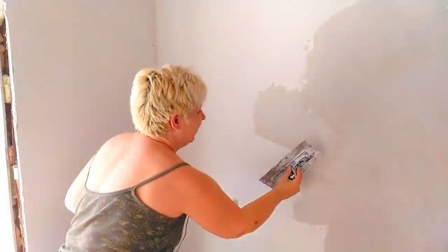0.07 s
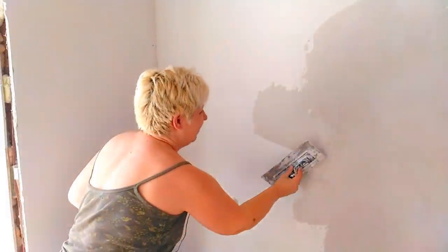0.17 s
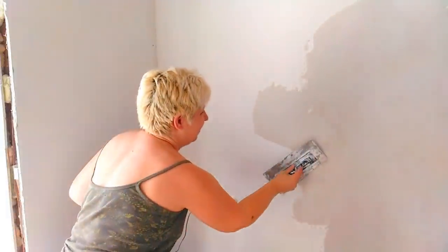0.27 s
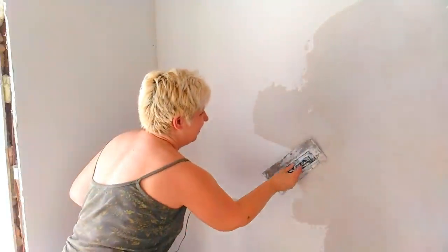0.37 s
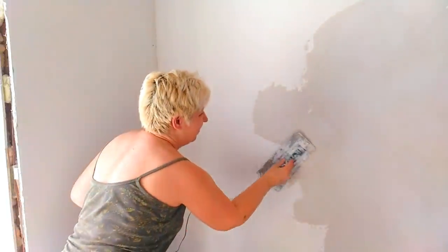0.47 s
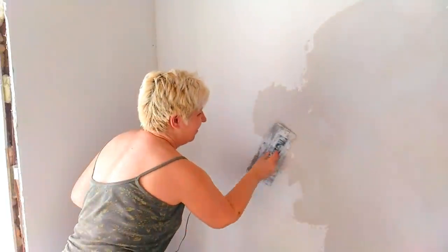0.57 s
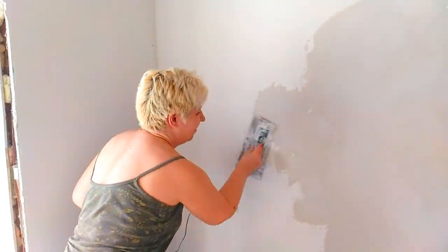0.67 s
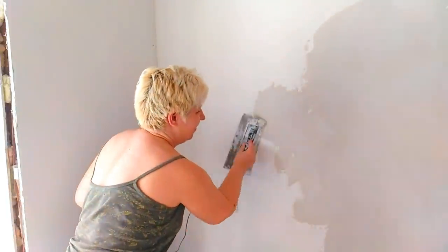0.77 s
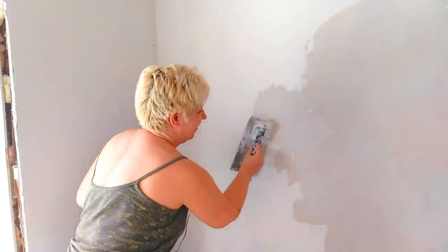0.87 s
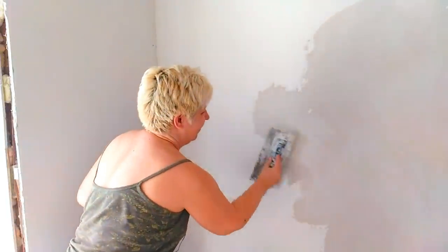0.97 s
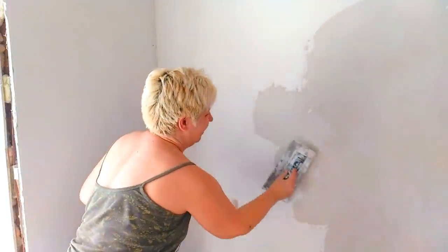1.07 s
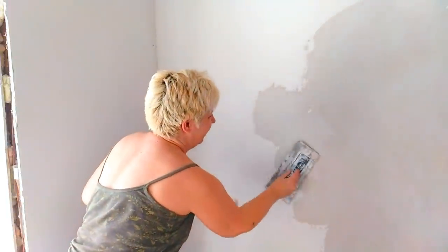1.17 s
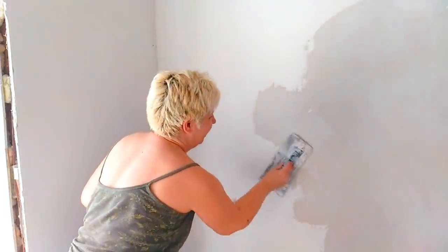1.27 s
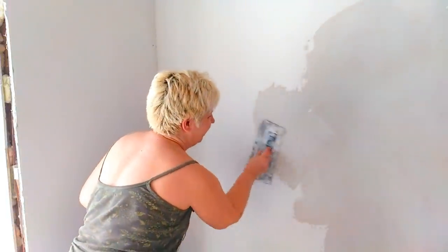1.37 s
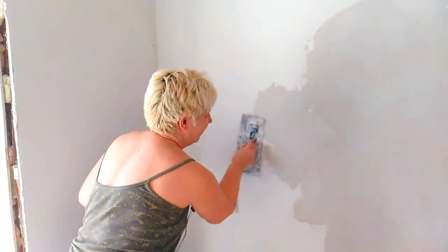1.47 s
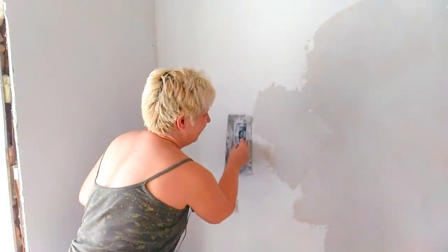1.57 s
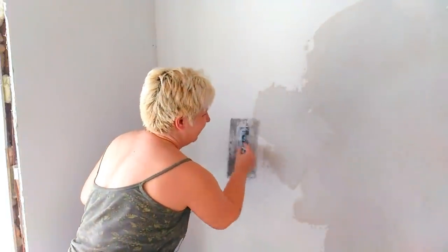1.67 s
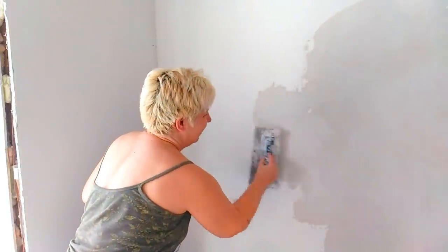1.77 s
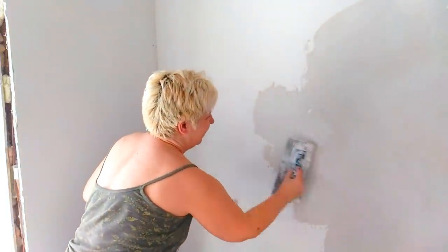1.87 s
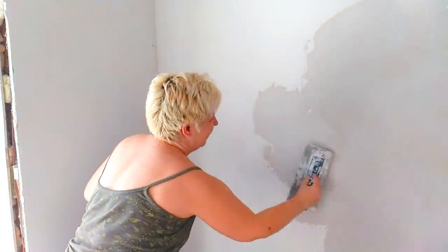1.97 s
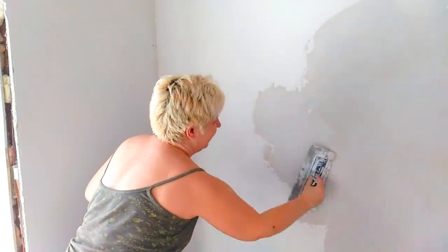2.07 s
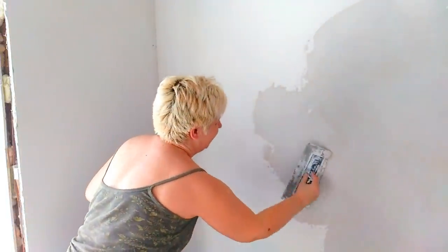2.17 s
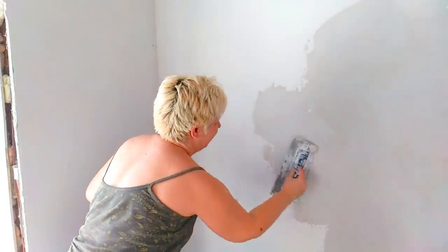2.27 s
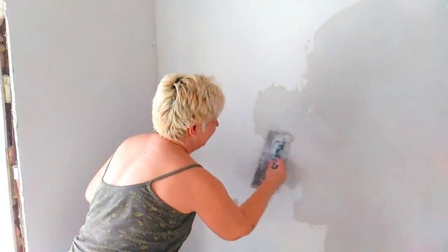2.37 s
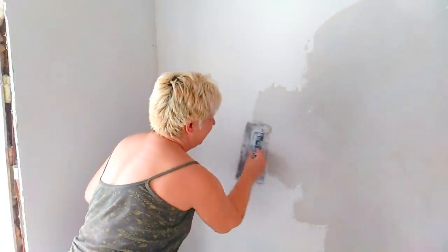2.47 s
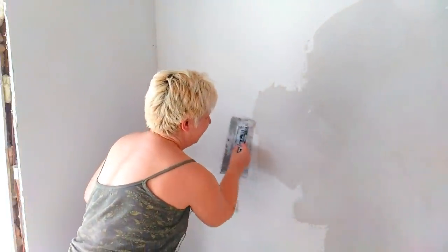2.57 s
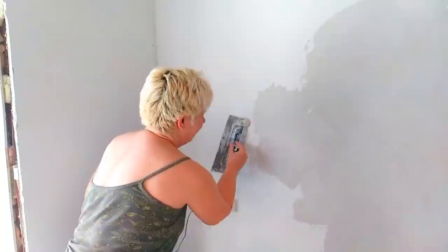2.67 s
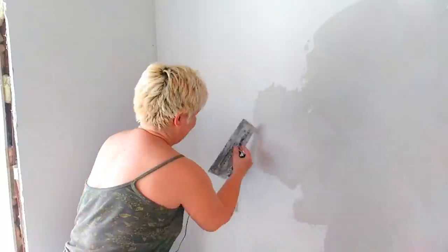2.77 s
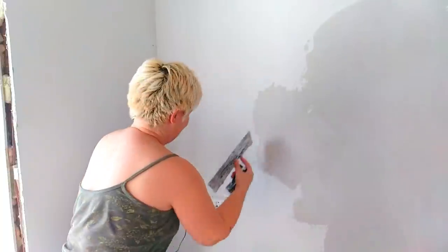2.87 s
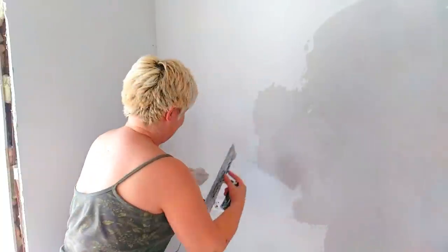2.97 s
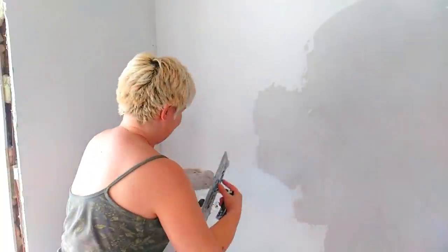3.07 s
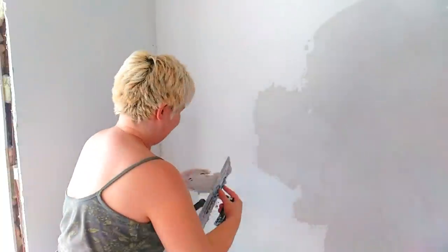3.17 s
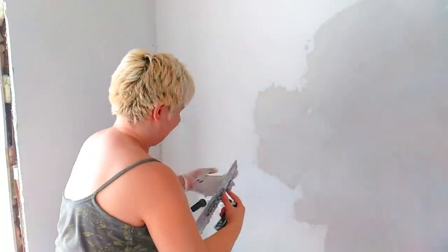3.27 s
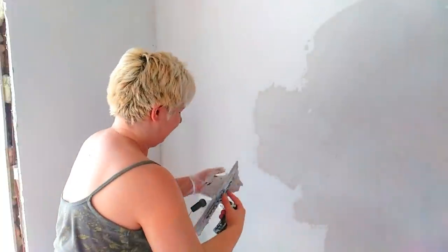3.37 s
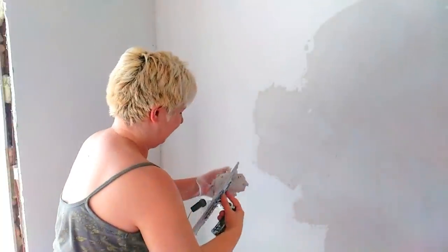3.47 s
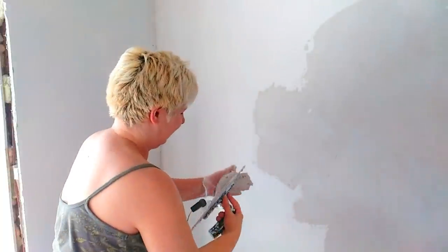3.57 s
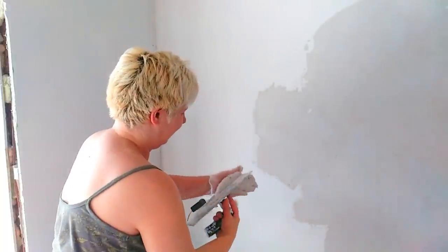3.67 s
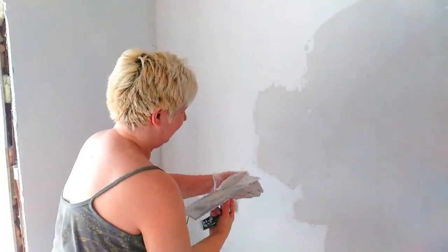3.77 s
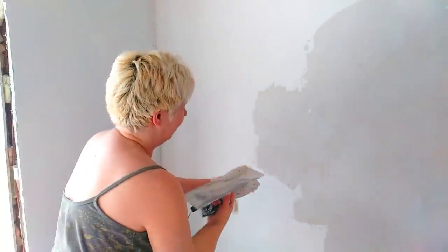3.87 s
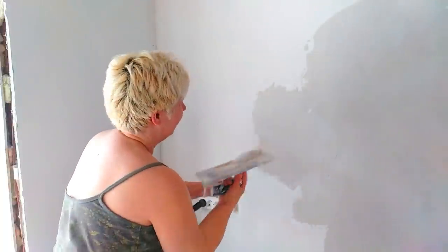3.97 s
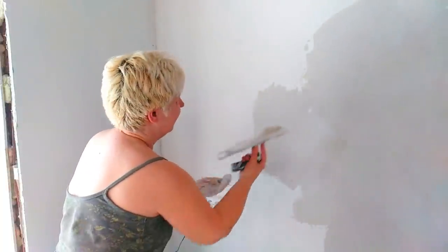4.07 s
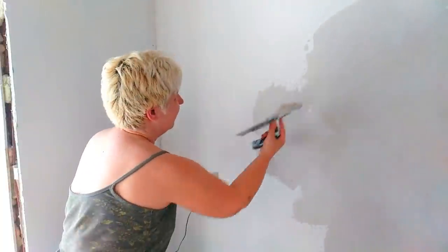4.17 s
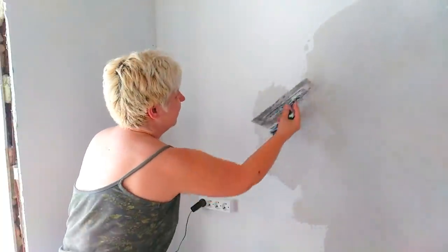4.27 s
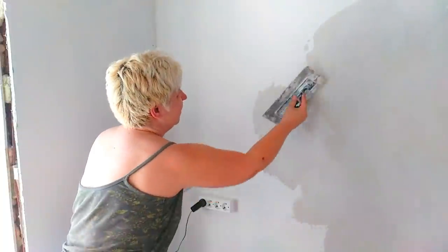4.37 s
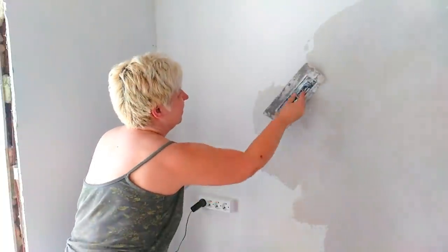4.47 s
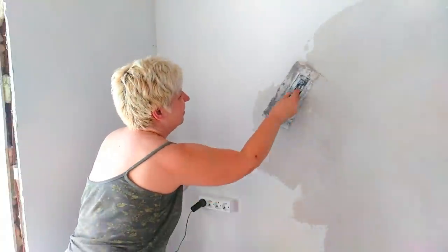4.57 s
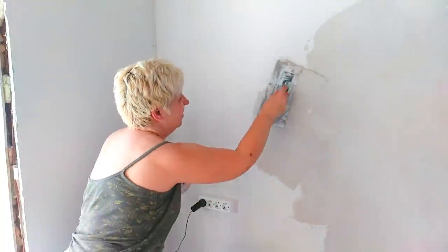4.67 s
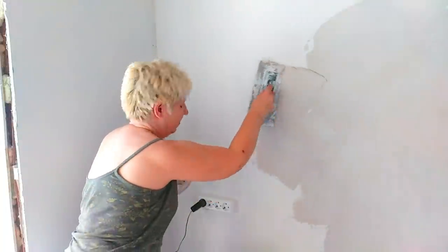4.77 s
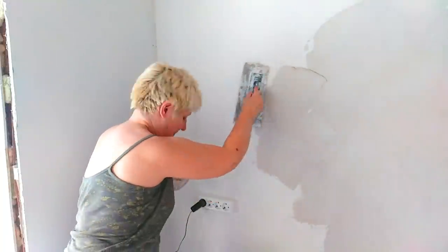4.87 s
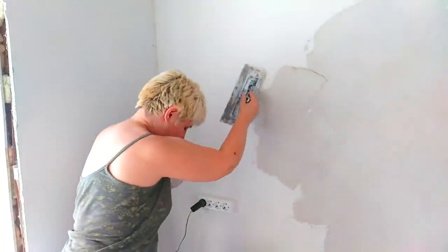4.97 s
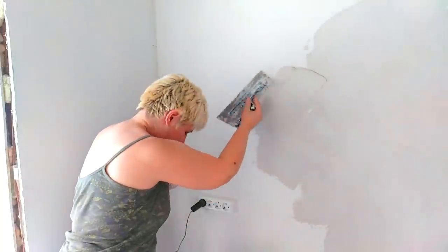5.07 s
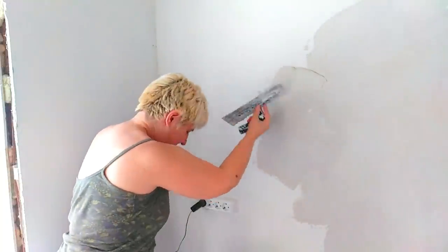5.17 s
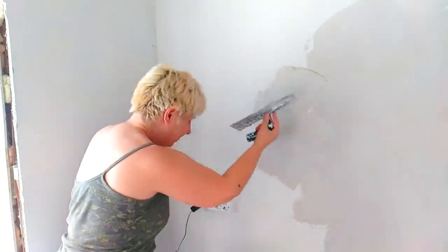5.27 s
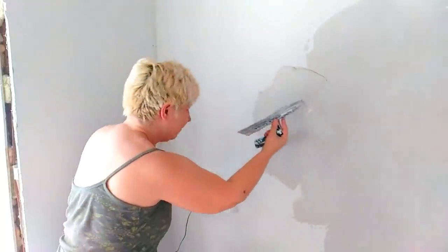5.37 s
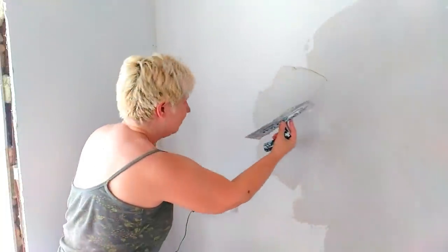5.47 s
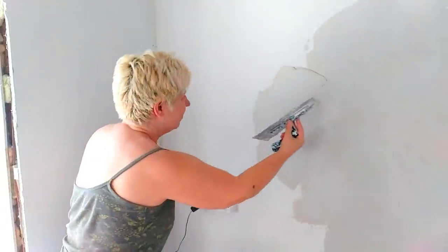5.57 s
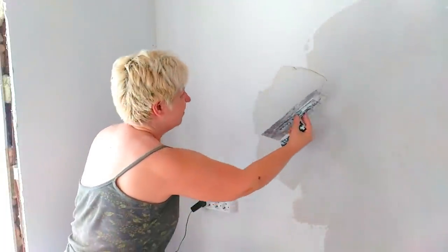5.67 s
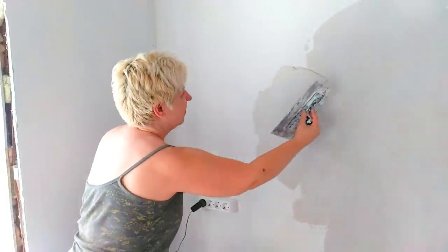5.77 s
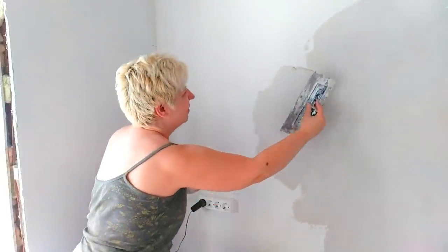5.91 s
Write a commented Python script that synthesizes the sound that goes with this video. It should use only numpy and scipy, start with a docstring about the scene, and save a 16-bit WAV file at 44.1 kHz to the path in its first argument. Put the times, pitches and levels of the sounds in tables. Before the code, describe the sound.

Close stereo sound of plastering: sandy, metallic scrapes swell and cut off abruptly, each introduced by a clack or hollow wall knock. Three strong strokes fall in the first half, then only soft brushing, then a rising scrape that ends in a bright snap and a few light taps. The bare room adds a brief, diffuse echo, over low rumble and faint hiss.

```python
"""In a small bare room, a steel trowel spreads wet plaster on a wall.
Blade landings are short bursts of noise that clack, splash and knock; some also thump the wall's low modes.
Under the dragging steel, random clicks stand for grit and are filtered into rub, rasp and hiss.
Short noise bands swell the scrape for a moment around one pitch, and random echoes blur the trowel.
Low rumble and faint hiss lie beneath; the loudest peaks are rounded off near full scale."""
import sys
import numpy as np
from scipy import signal
from scipy.fft import rfft, irfft
from scipy.io import wavfile

SR = 44100
rng = np.random.default_rng(int(sys.argv[2]) if len(sys.argv) > 2 else 0)


def transcribe(signal):
    """Save signal, clipped to [-1, 1], as a 16-bit WAV file at the path in sys.argv[1]."""
    frames = np.atleast_2d(signal).T
    limited = np.clip(frames, -1, 1)
    pcm = np.round(limited * 32767).astype(np.int16)
    wavfile.write(sys.argv[1], SR, pcm)


N = 261954
TIME = np.arange(N) / SR  # seconds


def gain_of(db):
    """Turns decibels into amplitude."""
    return 10 ** (np.asarray(db) / 20)


def evened(x):
    """Scales a sound to an average (rms) level of 1."""
    return x / np.sqrt(np.mean(x ** 2) + 1e-20)


def read(points, hz):
    """Reads a two-column table between its points, along a log-frequency axis."""
    table_hz, value = np.transpose(points)
    return np.interp(np.log(hz + 1), np.log(table_hz + 1), value)


def add(mix, start_s, sound):
    """Mixes a sound in at its start time."""
    part = mix[max(round(start_s * SR), 0):][:len(sound)]
    part += sound[:len(part)]


def band(x, hz, spread, order=2):
    """Keeps a band that reaches a factor of 1 + spread to either side of hz."""
    edges = [hz / (1 + spread), hz * (1 + spread)]
    return signal.sosfilt(signal.butter(order, edges, "band", fs=SR, output="sos"), x)


def wander(rate_hz):
    """Smooth random motion of rms 1: noise with everything from rate_hz up removed."""
    slow = rfft(rng.standard_normal(N)) * (np.fft.rfftfreq(N, 1 / SR) < rate_hz)
    return evened(irfft(slow, N))


def ramp(t, length_s):
    """Rises from 0 to 1 as t goes from 0 to length_s."""
    return np.clip(t / max(length_s, 1e-4), 0, 1)


BITE_S = 0.017  # the edge bites almost at once
TILT_LEAD_S, TILT_S = 0.022, 0.12  # tilting starts this long before the lift, and takes this long
TILT_HISS_DB, TILT_RUB_DB = -8.5, 6  # tilting trades hiss for rub
SKIM_DB, PRESS_RANGE_DB = -55.5, 28.5  # rasp of a barely touching blade; how much louder fully pressed
MURMUR_GROWTH, RUB_GROWTH = 0.287, 1.06  # growth under pressure, relative to the rasp's
MURMUR_DB_PER_S = 60.5  # how fast the wall's murmur fades
RUB_FADE = 0.99  # the rub's speed of fading, relative to the rasp's

# Passes of the blade, pressed hard or skimming; hiss and rub are relative to the rasp:
# start_s, rise_s (until full pressure), hold_s, growth_db (until full pressure), lift_db_per_s (fading),
# rasp_db (steel), hiss_db (grit), rub_db (wall), murmur_db (wall)
PASSES = [(-.05, .08, 0.31, -18, 22, -45.5, -5.5, -1, -70), (.44, .16, 0.21, 26, 304, -13.5, 3.5, -10, -39),
          (1.268, .04, 0.098, 3, 194, -47, 8.5, -9, -38),
          (1.378, 0.025, 0.052, 3, 200, -25.5, -0.5, -15, -45),
          (1.435, 0.029, 0.13, 9.5, 200, -11, 3.5, -13.5, -39.5),
          (1.8, .02, 0.26, 3, 200, -50, -9, -8.5, -59), (2.192, .06, 0.022, 14, 240, -31, 3, -3, -37),
          (2.239, 0.19, 0.26, 15, 241, -17.5, 6.5, -7, -38.5),
          (2.804, 0.026, 0.091, 7, 55, -52, 2, 3.5, -40.5), (3.273, 0.24, 0.067, 2, 33, -53.5, 11, -8, -78),
          (3.6, 0.077, 0.042, 7, 81, -50, 11.5, -8, -70),
          (3.806, 0.025, 0.021, -3, 153, -47.5, 3.5, -6, -68),
          (4.064, 0.05, 0.052, -1, 245.5, -49.5, -3, -1.5, -70),
          (4.604, 0.026, 0.039, -7, 200, -40, 8, -15, -51),
          (4.698, .255, .012, 24.5, 249, -18.5, 7, -5, -46),
          (5.046, 0.032, 0.19, -21, 260, -40.5, 10, -12, -47),
          (5.328, 0.0074, 0.031, 0, 260, -35, 9.5, -3.5, -50),
          (5.474, 0.046, 0.037, 9, 320, -46, 3.5, 1.5, -42.5), (5.697, 0.12, .04, 5, 198, -55, 5, -14, -49)]


def drag(step=32):
    """Pressure, tilt and lift of each pass set the levels (dB) of rasp, hiss, rub and murmur."""
    clock, power = TIME[::step], 1e-12
    for start_s, rise_s, hold_s, growth_db, lift_db_per_s, full_db, hiss_db, rub_db, murmur_db in PASSES:
        t = clock - start_s
        lifted_s = t - rise_s - hold_s
        fading_s = np.maximum(lifted_s, 0)
        slack_db = growth_db * (1 - ramp(t, rise_s))
        fade_db = lift_db_per_s * fading_s
        pressed = ramp(full_db - SKIM_DB, PRESS_RANGE_DB)
        # the harder the pass is pressed, the more its tilt is heard
        tilt = ramp(lifted_s + TILT_LEAD_S, TILT_S) * pressed
        rasp = full_db - slack_db - fade_db
        hiss = rasp + hiss_db + TILT_HISS_DB * tilt
        rub = full_db + rub_db - RUB_GROWTH * slack_db + TILT_RUB_DB * tilt - RUB_FADE * fade_db
        murmur = murmur_db - MURMUR_GROWTH * slack_db - MURMUR_DB_PER_S * fading_s
        # overlapping passes add as power
        power = power + (ramp(t, BITE_S) * gain_of([rasp, hiss, rub, murmur])) ** 2
    return [np.interp(TIME, clock, db) for db in 10 * np.log10(power)]


def grit(per_s, spread_db):
    """Sand grains slipping under the edge: dense clicks of uneven size."""
    size = gain_of(spread_db * np.minimum(rng.exponential(1, N), 4))
    sign = rng.choice([-1, 1], N)
    slips = rng.random(N) < per_s / SR
    return evened(size * sign * slips)


# Colour of the scrape: pitch_hz, level_db
SCRAPE_COLOUR = [(100, -6), (190, -10), (232, -0.5), (330, -6.5), (560, -10), (950, -5), (1700, 1.5),
                 (2700, 1.5), (3600, -2), (6400, -5), (9000, 3), (10400, 0), (12200, -10), (15400, -18)]


def coloured(x, low_hz, high_hz, size=4096):
    """Filters x with one region of the scrape colour; the filter starts promptly and has unit energy."""
    hz = abs(np.fft.fftfreq(size, 1 / SR)) + 1
    edges = np.sqrt((1 + (low_hz / hz) ** 8) * (1 + (hz / high_hz) ** 8))
    gain = gain_of(read(SCRAPE_COLOUR, hz)) / edges
    # this phase packs the filter's energy near its start
    spectrum = np.exp(np.conj(signal.hilbert(np.log(gain + 1e-5))))
    ring = np.fft.ifft(spectrum).real[:size // 2]
    return signal.oaconvolve(x, ring / np.linalg.norm(ring))[:N]


def scrape(drag_db):
    """Grit under one part of the edge drives wall (rub), steel (rasp) and wet surface (hiss)."""
    rasp_db, hiss_db, rub_db = drag_db
    rub = coloured(grit(per_s=3000, spread_db=2.0) * gain_of(rub_db), 123, 970)
    rasp = coloured(grit(per_s=2500, spread_db=3.5) * gain_of(rasp_db), 880, 4900)
    hiss = coloured(grit(per_s=5000, spread_db=4.5) * gain_of(hiss_db), 4820, 21000)
    return gain_of(-3.0) * rub + gain_of(-0.48) * rasp + gain_of(-1.17) * hiss


# The scrape swells for a moment around one pitch:
# middle_s, length_s, pitch_hz, spread (fraction of pitch), level_db
SCRAPE_SWELLS = [(.77, .12, 1670, 0.17, -19), (0.754, 0.19, 4380, 0.34, -15),
                 (1.524, 0.2, 5130, 0.28, -11.5), (1.58, .12, 2200, 0.29, -13.5),
                 (2.544, 0.25, 690, 0.78, -21.5), (2.685, .11, 840, 0.77, -14),
                 (4.959, 0.09, 1380, 0.53, -14.5), (5.23, 0.095, 820, 0.45, -37.5)]


def scrape_swells():
    """Short noise bands, each around one pitch, that rise and fall within the scrape."""
    out = np.zeros(N)
    for middle_s, length_s, pitch_hz, spread, db in SCRAPE_SWELLS:
        spell = signal.windows.hann(int(length_s * SR))
        noise = evened(band(rng.standard_normal(len(spell)), pitch_hz, spread))
        add(out, middle_s - length_s / 2, gain_of(db) * spell * noise)
    return out


def strokes(drag_db, judder_db=2.0, count=3):
    """The whole blade judders; each part of its long edge sounds into the room by its own paths."""
    juddering_db = drag_db + judder_db * wander(rate_hz=46)
    parts = [room(scrape(juddering_db) + scrape_swells(), direct_db=-5.0) for _ in range(count)]
    return sum(parts) / np.sqrt(count)


KNOCK_SPREAD = 0.61  # width of a knock, as a fraction of its pitch


def contact(contact_s, db, knock_hz=None):
    """A noisy burst of force as steel lands bit by bit; given a pitch, it becomes a knock."""
    t = TIME[:SR // 8]
    burst = t / contact_s * np.exp(-t / contact_s) * rng.standard_normal(len(t))
    if knock_hz:
        burst = band(burst, knock_hz, KNOCK_SPREAD)
    return gain_of(db) * burst / np.linalg.norm(burst)


EDGE_KNOCK_HZ, FLAT_CONTACT_S = 720, 0.0066

# The blade lands edge first, then flat:
# start_s, contact_s, delay_s (until flat), clack_db, splash_db, edge_knock_db, flat_knock_db,
# flat_knock_hz, wall_thump_db
LANDINGS = [(.341, 0.0026, 0.0068, -26.5, -29.5, -19, -17, 173, -14.5),
            (1.264, 0.0065, .01, -27.5, -28.5, -32.5, -19.5, 296, -17.5),
            (2.17, 0.0039, 0.015, -22.5, -23.5, -30.5, -24, 195, -21),
            (4.222, 0.0027, 0.013, -26.5, -30, -25.5, -28, 230, -60),
            (4.5, 0.0073, .016, -23, -17, -21.5, -15.5, 235, -31),
            (5.386, 0.0033, 0.00193, -30, -35, -35, -32, 320, -21.5),
            (5.803, .0046, 0.0113, -28, -32, -31, -28.5, 180, -34)]
# The edge alone taps the wall or snags a lump: start_s, contact_s, clack_db, splash_db, knock_db
TAPS = [(0.29, 0.0032, -40, -33, -33.5), (.331, 0.0028, -29, -43, -33), (.438, 0.0037, -40, -28, -48),
        (.476, 0.0046, -23, -29, -39), (2.031, 0.0098, -44, -37, -34), (2.394, 0.0033, -15, -27, -34.5),
        (4.033, 0.0045, -35, -25.5, -40.5), (4.618, 0.0099, -33.5, -29.5, -49),
        (4.752, 0.0049, -19.5, -34, -33), (4.866, 0.00064, -17.5, -9.5, -21.5),
        (5.745, 0.0022, -33, -46, -48)]


def impacts(energy_s=.003, tap_hz=450):
    """The blade meets a wall cushioned by wet plaster: steel clacks, plaster squashes out, wall knocks."""
    clack, splash, knock = np.zeros((3, N))
    for start_s, contact_s, delay_s, clack_db, splash_db, edge_db, flat_db, flat_hz, _ in LANDINGS:
        add(clack, start_s, contact(contact_s, clack_db))
        add(splash, start_s, contact(contact_s, splash_db))
        add(knock, start_s, contact(contact_s, edge_db, EDGE_KNOCK_HZ))
        add(knock, start_s + delay_s, contact(FLAT_CONTACT_S, flat_db, flat_hz))
    for start_s, contact_s, clack_db, splash_db, knock_db in TAPS:
        add(clack, start_s, contact(contact_s, clack_db))
        add(splash, start_s, contact(contact_s, splash_db))
        add(knock, start_s, contact(contact_s, knock_db, tap_hz))
    # a blow has the energy of its level held for energy_s
    blows = coloured(clack, 550, 3500) + coloured(splash, 3800, 14000) + knock
    return np.sqrt(energy_s * SR) * blows


# Low modes of wall and room: pitch_hz, level_db, t60_s (time to fade by 60 dB)
WALL_MODES = [(77.3, 2.5, 0.28), (138.5, -11.5, 0.25), (232.6, -10.5, 0.27)]


def boom(murmur_db, rise_s=0.0051):
    """Low modes ring after each landing; noise around the lowest murmurs under the moving blade."""
    murmur = evened(band(rng.standard_normal(N), WALL_MODES[0][0], spread=0.22))
    out = gain_of(murmur_db) * murmur
    t = TIME[:SR // 2]
    ring = np.zeros(len(t))
    for hz, db, t60_s in WALL_MODES:
        ring += gain_of(db) * np.sin(2 * np.pi * hz * t) * np.exp(-np.log(1000) * t / t60_s)
    onset = 1 - np.exp(-t / rise_s)
    for start_s, _, delay_s, *_, thump_db in LANDINGS:
        add(out, start_s + delay_s, -gain_of(thump_db) * ring * onset)
    return out


# The deep rumble swells as the body shifts: middle_s, length_s, level_db
RUMBLE_SWELLS = [(4.535, .12, -32), (4.68, 0.16, -37.5), (5.436, 0.123, -31), (5.837, .16, -29.5)]


def rumble_swells():
    """Short surges of low rumble under the late strokes: deep noise that rises and falls."""
    out = np.zeros(N)
    for middle_s, length_s, db in RUMBLE_SWELLS:
        spell = signal.windows.hann(int(length_s * SR))
        # the end of a longer noise, where the filter has settled
        rumble = band(rng.standard_normal(SR), 36, spread=.5)[-len(spell):]
        add(out, middle_s - length_s / 2, gain_of(db) * spell * evened(rumble))
    return out


# How alike left and right are: pitch_hz, likeness (0 unrelated, 1 identical)
LIKENESS = [(60, 0.46), (300, 0.93), (640, 0.4), (1300, 0), (15000, 0.099)]


def paired(z, hz):
    """Mixes two unrelated spectra into a left-right pair, alike by a different amount at each pitch."""
    same = np.clip(read(LIKENESS, hz), -1, 1)
    return np.array([z[0], same * z[0] + np.sqrt(1 - same ** 2) * z[1]])


# Echoes of the bare room: pitch_hz, t60_s (time to fade by 60 dB)
ROOM_T60 = [(100, 0.82), (250, 0.32), (600, 0.43), (1200, 0.36), (3000, 0.36), (8000, .37), (13000, 0.23)]


def echoes(first_s=.002, size=SR // 2):
    """Dense random reflections in stereo, each pitch dying away at its own speed."""
    sign = rng.choice([-1., 1.], (2, size))
    arrives = rng.random((2, size)) < 5000 / SR  # about 5000 a second
    taps = sign * arrives * (TIME[:size] > first_s)
    hz, t, z = signal.stft(taps, SR, nperseg=256)
    fade = np.exp(-np.log(1000) * t / read(ROOM_T60, hz)[:, None])
    z = paired(z, hz[:, None]) * fade
    tail = signal.istft(z, SR, nperseg=256)[1]
    tail /= np.linalg.norm(tail, axis=1, keepdims=True)
    return tail


def room(x, direct_db, count=2):
    """The moving trowel sweeps between echo patterns; its direct sound reaches two ports a little apart."""
    travel = 2 * np.pi * 1.3 * TIME + rng.uniform(0, 2 * np.pi)  # 1.3 cycles a second
    places = [np.cos(travel + np.pi * k / count) for k in range(count)]
    wet = sum(signal.oaconvolve((x * near)[None], echoes(), axes=1)[:, :N] for near in places)
    direct = np.array([np.roll(x, lag) for lag in rng.integers(0, 12, 2)])  # lag in samples
    return (wet + gain_of(direct_db) * direct) / np.sqrt(1 + gain_of(direct_db) ** 2)


FLOOR_DB = -47.5  # overall background level

# Colour of the steady background: pitch_hz, level_db (relative)
FLOOR_COLOUR = [(20, 3.5), (45, -7), (100, -16.5), (230, -19.5), (500, -19), (1200, -27), (3000, -28),
                (6500, -32), (9000, -25.5), (12000, -36.5), (15400, -35)]


def background():
    """Low rumble and faint hiss of the house: steady noise shaped by pitch."""
    hz = np.fft.rfftfreq(N, 1 / SR)
    z = paired(rfft(rng.standard_normal((2, N))), hz) * gain_of(read(FLOOR_COLOUR, hz))
    return gain_of(FLOOR_DB) * evened(irfft(z, N))


def scene():
    """The trowel in the room, over the wall's boom, the rumble swells and the background."""
    *drag_db, murmur_db = drag()
    trowel = strokes(np.array(drag_db)) + room(impacts(), direct_db=-2.5)
    # small left-right level differences, in dB
    balanced = trowel * gain_of([[-.2], [.2]]) + boom(murmur_db) * gain_of([[.6], [-.6]])
    return balanced + rumble_swells() + background()


TOP_HZ = 15700  # upper limit of the sound


def record(dry, ceiling=1.0):
    """The loudest peaks are rounded off near full scale; then the top treble is cut."""
    clipped = dry / (1 + (dry / ceiling) ** 8) ** (1 / 8)
    lowpass = signal.firwin(511, TOP_HZ, window=("kaiser", 9), fs=SR)
    return signal.oaconvolve(clipped, lowpass[None], "same")


dry = scene()
out = record(dry)
transcribe(out)
```